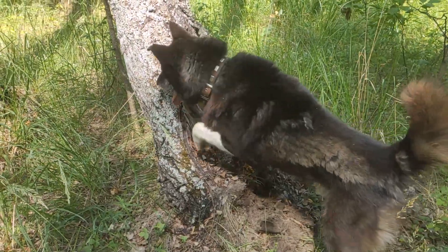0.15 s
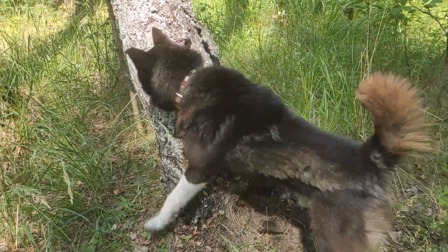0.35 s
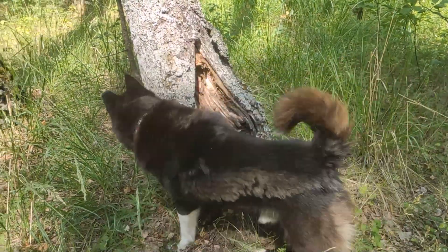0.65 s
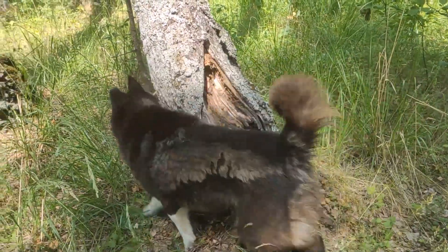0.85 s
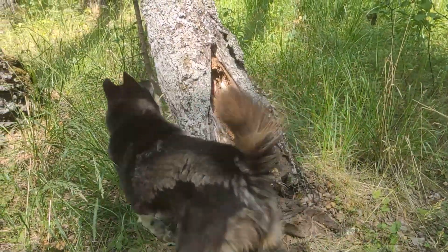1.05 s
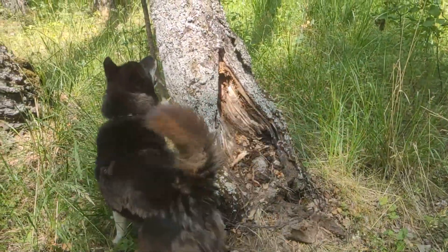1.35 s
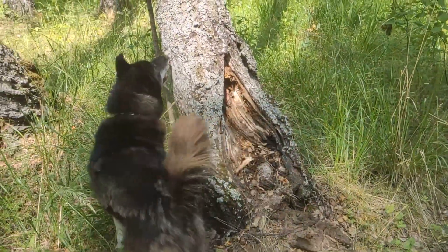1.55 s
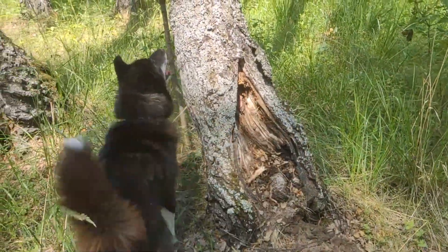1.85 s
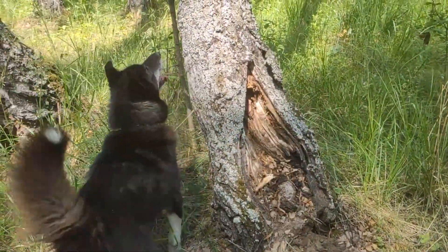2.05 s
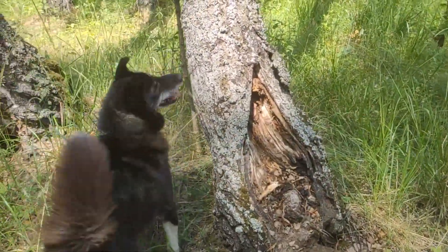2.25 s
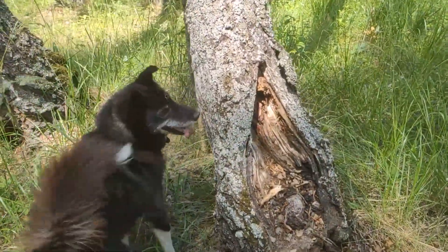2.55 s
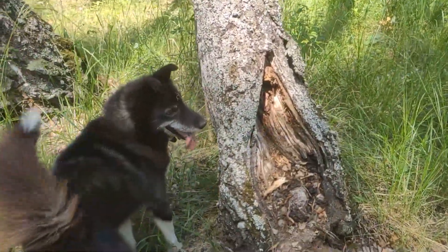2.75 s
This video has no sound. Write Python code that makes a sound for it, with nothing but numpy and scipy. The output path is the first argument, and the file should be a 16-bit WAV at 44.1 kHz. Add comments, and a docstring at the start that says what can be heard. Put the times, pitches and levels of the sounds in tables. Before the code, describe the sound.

A dog rustles through dry grass and litter after its claws snap crumbling wood off a trunk

```python
"""Dog in a dry forest

A dog drops from a rotten tree trunk, its claws snapping off bits of bark, and walks round through dry grass.
Stems swish along its legs and coat, dead litter crunches under its paws and twigs crack, over quiet forest air.
Crackling noise makes the grass, litter and crumbs; fading noise makes the thuds; sharp bursts make the snaps.
Two microphone ports each colour the high treble in their own way."""
import sys
import numpy as np
from scipy import signal
from scipy.fft import rfft, irfft, next_fast_len
from scipy.io import wavfile
from scipy.ndimage import uniform_filter1d, map_coordinates

SR = 44100
rng = np.random.default_rng(int(sys.argv[2]) if len(sys.argv) > 2 else 0)


def master_out(mix):
    """Clip the mix to full scale and print it as 16-bit PCM to the path in sys.argv[1]."""
    frames = np.transpose(np.atleast_2d(mix))
    ceiling = np.clip(frames, -1, 1)
    pcm = np.round(ceiling * 32767).astype(np.int16)
    wavfile.write(sys.argv[1], SR, pcm)


N = 127890  # length [samples]

# colour of splintering wood: (frequency [Hz], level [dB])
SPLINTER_COLOUR = [(200, -20.5), (1500, -24), (3200, -23.5), (5000, -9), (7500, -3.5), (9800, 0.5),
                   (14000, -1.5)]


def amp(db):
    """Turn decibels into a gain."""
    return 10 ** (np.asarray(db) / 20)


def unit(x):
    """Scale to an average strength (rms) of 1."""
    return x / np.sqrt(np.mean(x ** 2) + 1e-20)


def along(points, hz):
    """Read a curve of (frequency [Hz], value) points, spaced as the ear hears pitch (log axis)."""
    point_hz, value = np.transpose(points)
    return np.interp(np.log(hz + 1), np.log(point_hz + 1), value)


def filtered(x, response):
    """Filter x with a gain that depends on frequency."""
    length = next_fast_len(N + 8192)  # silent padding, so that the end does not wrap round to the start
    gain = response(np.fft.rfftfreq(length, 1 / SR))
    return irfft(rfft(x, length) * gain, length)[..., :N]


def wobble(rate):
    """Draw a smooth random curve through `rate` random points a second."""
    points = rng.standard_normal(N // 100)
    return map_coordinates(points, [np.arange(N) * rate / SR], mode="wrap")


def white():
    """Make two unrelated noises."""
    return rng.standard_normal((2, N))


def coloured(pair, spectrum):
    """Colour a white pair at equal power; how alike left and right are depends on frequency."""
    # likeness of left and right: (frequency [Hz], likeness [0 to 1])
    likeness = [(30, 0.033), (130, 0.31), (400, 0.76), (1100, 0.54), (2500, 0.21), (5000, 0),
                (14000, 0.026)]
    norm = np.sqrt(np.mean(amp(along(spectrum, np.linspace(0, SR / 2, 2000))) ** 2))

    def response(hz):
        # a small angle puts most power in the middle, a larger one more at the sides
        angle = np.arccos(np.clip(along(likeness, hz), -1, 1)) / 2
        return amp(along(spectrum, hz)) / norm * [np.cos(angle), np.sin(angle)]

    mid, side = filtered(pair, response)
    return np.array([mid + side, mid - side])


def panned(db):
    """Give left and right gains for a right-left difference."""
    return amp([[-db / 2], [db / 2]])


def fade(t, t60):
    """Stay full until t = 0, then fall 60 dB in t60 seconds."""
    return np.exp(-np.log(1000) * np.maximum(t, 0) / t60)


def since(s):
    """Count the seconds since time s, for every sample."""
    return np.arange(N) / SR - s


def strokes(rows, t60):
    """Shape stereo strokes that rise, hold and die away; where they overlap, their powers add."""
    power = 0
    for start, rise, hold, db, pan_db in rows:
        swell = np.clip(since(start) / rise, 0, 1)
        shape = swell * fade(since(start + rise + hold), t60)
        power = power + (amp(db) * panned(pan_db) * shape) ** 2
    return np.sqrt(power)


def crackle(per_s, spread_db, hiss, grain_t60=0.0086):
    """Tiny fractures of random size, over the hiss of those too small to tell apart."""
    struck = rng.random(N) < per_s / SR
    size = amp(spread_db * np.minimum(rng.exponential(size=N), 4))
    hits = struck * size ** 2
    # each hit dies away; doubling the time step turns the amplitude fade into a power fade
    power = signal.lfilter([1], [1, -fade(2 / SR, grain_t60)], hits)
    return unit(white() * np.sqrt(power / power.mean() + hiss ** 2))


def patchy(pair, depth_db):
    """Make small patches of time and pitch louder or softer: each flurry favours its own pitches."""
    z = signal.stft(pair, nperseg=512)[2]
    field = rng.standard_normal(z.shape[1:])
    for axis in (0, 1):  # smooth over pitch, then time
        field = uniform_filter1d(field, size=5, axis=axis)
    patched = signal.istft(z * amp(depth_db * unit(field)), nperseg=512)[1]
    return unit(patched[:, :N])


def add(track, s, sound):
    """Mix a short sound in at time s."""
    part = track[:, max(round(s * SR), 0):][:, :sound.shape[-1]]
    part += sound[..., :part.shape[1]]


def air():
    """Quiet forest air is a steady noise; a light breeze on the ports is a low noise that swells and sinks."""
    # colour of the forest air: (frequency [Hz], level [dB])
    air_colour = [(25, 1), (60, -19), (120, -8), (380, -12.5), (900, -19), (2400, -8), (3500, -20),
                  (6000, -9.5), (10000, -13), (14000, -12.5)]
    # colour of the breeze: (frequency [Hz], level [dB])
    wind_colour = [(8, 0), (25, -13), (60, -16), (150, -34), (400, -65)]
    air_db, wind_db, wind_swing_db = -50, -55, 2
    wind_gain = amp(wind_db + wind_swing_db * wobble(rate=5.03))
    return amp(air_db) * coloured(white(), air_colour) + wind_gain * coloured(white(), wind_colour)


def steps():
    """Soft paws thud on the forest floor: each landing is a burst of mostly low noise that dies away."""
    # paws landing: (time [s], level [dB])
    landings = [(0.265, -52), (0.398, -65), (0.504, -50.5), (0.792, -46.5), (1.17, -47), (1.567, -54),
                (1.7394, -41.5)]
    # colour of the ground: (frequency [Hz], level [dB])
    ground_colour = [(40, -13), (120, -0.5), (240, -0.5), (500, -8), (1200, -7.5), (3000, -26.5)]
    thuds = 0
    for s, db in landings:
        thuds = thuds + amp(db) * (since(s) >= 0) * fade(since(s), t60=0.064)
    return coloured(thuds * white(), ground_colour)


def litter():
    """Needles and wood crumbs crush in flurries under the paws, which scuff in the soil below; now and then the
    dog pants, soft and hollow."""
    # Strokes: (start [s], rise [s], hold [s], level [dB], right-left difference [dB])
    crunches = [(.495, 0.037, .05, -55, -2), (.715, 0.02, 0.011, -47, -2.5),
                (1.54, 0.027, 0.0078, -48.5, -1), (1.73, 0.085, 0.058, -47, -9),
                (1.87, 0.036, 0.067, -45.5, -9), (2.06, 0.061, 0.057, -45, -6),
                (2.18, 0.017, 0.16, -50, -6), (2.32, 0.12, 0.05, -43, 1.5),
                (2.5, 0.032, 0.052, -46.5, -7.5)]  # weight pressing on dead litter
    scuffs = [(.5, 0.079, 0.088, -54.5, -5), (.77, 0.016, 0.006, -50.5, -2),
              (1.165, 0.0078, 0.023, -60, -3), (1.27, 0.0064, 0.035, -54.5, 0),
              (1.485, 0.01, 0.065, -58, -4.5), (1.76, 0.1, 0.11, -58, 3), (2.11, 0.013, .01, -61, 6),
              (2.82, .035, 0.042, -56.5, -1)]  # paws scuffing the soil
    breaths = [(.32, 0.021, 0.28, -62.5, -5), (1.485, 0.017, 0.033, -61, -10), (1.77, 0.02, 0.25, -61, -7),
               (2.03, 0.025, 0.22, -61, -6), (2.47, 0.029, 0.07, -55.5, -4), (2.58, 0.026, 0.17, -64, -5),
               (2.81, 0.034, 0.02, -56, -5.5)]  # soft, hollow panting breaths
    # Colours: (frequency [Hz], level [dB])
    litter_colour = [(150, -28), (500, -10), (1100, -8.5), (1700, 2), (2300, 8.5), (3200, -1), (4200, 1),
                     (5800, -9), (12000, -8)]
    soil_colour = [(80, 5), (300, -4), (750, 4), (1400, 3.5), (3000, -7.5)]
    hollow_colour = [(120, -31), (260, -9), (370, 2.5), (500, -6.5), (640, -10), (800, -3.5), (1300, -47),
                     (3000, -14.5)]

    crunch = patchy(crackle(per_s=420, spread_db=-1.5, hiss=0.88), depth_db=3)
    crunch = crunch * strokes(crunches, t60=0.37)
    scuff = patchy(crackle(per_s=700, spread_db=-0.5, hiss=0.37), depth_db=2.5)
    scuff = scuff * strokes(scuffs, t60=0.34)
    breath = patchy(white(), depth_db=3.0) * strokes(breaths, t60=0.24)
    return coloured(crunch, litter_colour) + coloured(scuff, soil_colour) + coloured(breath, hollow_colour)


def grass():
    """Dry stems tick past the moving dog and go on settling behind it; green blades slide with a duller hiss."""
    # Strokes: (start [s], rise [s], hold [s], level [dB], right-left difference [dB])
    swishes = [(.33, 0.11, 0.07, -39.5, 2.5), (.465, 0.048, .005, -34, 0), (.498, 0.0053, 0.0064, -23.5, 0),
               (.525, 0.012, 0.045, -30, -3.5), (.7, 0.032, 0.087, -34.5, 0.5),
               (.86, 0.0076, 0.046, -38, 4), (.964, 0.0037, 0.025, -29.5, 4),
               (1.0, 0.0064, 0.066, -36.5, -1), (1.06, 0.03, 0.096, -32.5, 1.5),
               (1.16, 0.016, 0.013, -23, 1), (1.2, 0.014, 0.089, -33.5, 1.5),
               (1.26, 0.082, 0.077, -28.5, 2), (1.45, 0.013, 0.061, -38, 2), (1.54, 0.028, 0.0053, -28, -1),
               (1.6, 0.019, 0.057, -42.5, 1), (1.685, 0.025, 0.0075, -33.5, -2),
               (1.739, 0.0014, 0.0023, -25, 0.5), (1.765, 0.02, 0.11, -32, 2),
               (1.88, 0.01, 0.059, -28.5, 1.5), (1.942, 0.0095, 0.0062, -21, 2.5),
               (1.98, 0.015, 0.12, -40, 0.5), (2.06, 0.072, 0.17, -35, 0.5), (2.31, 0.046, 0.26, -33, 0)]  # stems brushing the dog
    slides = [(.39, 0.0075, 0.058, -47, -1), (.495, 0.025, 0.1, -39.5, 7), (.64, 0.013, 0.089, -48.5, 0.5),
              (.72, 0.0058, 0.081, -38.5, 0), (.82, 0.018, 0.16, -45.5, -1.5),
              (1.165, 0.008, 0.0085, -36, -5), (1.27, 0.062, 0.094, -46.5, -6),
              (1.55, 0.01, 0.014, -39.5, 5)]  # broad green blades sliding along the coat
    # Colours: (frequency [Hz], level [dB])
    stem_colour = [(200, -36), (900, -17), (1600, -19.5), (2200, -7.5), (3300, -15), (5500, -10),
                   (7500, 0.5), (11000, 1), (14000, -1)]
    blade_colour = [(1000, -28), (3000, -46), (4300, -4.5), (5400, 3), (6800, 5.5), (8500, -12),
                    (14000, -4.5)]

    swish = patchy(crackle(per_s=3800, spread_db=2.5, hiss=0.94), depth_db=2.1)
    swish = swish * strokes(swishes, t60=0.19)
    swish = swish * amp(0.59 * wobble(rate=110))  # a fast, slight flutter in level

    # the grass is first stirred as the dog comes down
    settle_db, settle_start_s, settle_rise_s = -46.5, 0.17, 0.44
    settle = amp(settle_db) * panned(db=-3.0) * crackle(per_s=530, spread_db=9.0, hiss=0.91)
    settle = settle * np.clip(since(settle_start_s) / settle_rise_s, 0, 1)

    slide = patchy(crackle(per_s=1100, spread_db=-4.0, hiss=0.72), depth_db=1.5)
    slide = slide * strokes(slides, t60=0.2)
    return coloured(swish + settle, stem_colour) + coloured(slide, blade_colour)


def crumbs():
    """Small flakes of rotten wood tick loose under the claws, in flurries that favour different pitches."""
    # rotten wood crumbling: (start [s], rise [s], hold [s], level [dB], right-left difference [dB])
    crumbles = [(0, 0.0063, 0.25, -45.5, -1), (.23, 0.13, 0.2, -44, -5), (.47, 0.042, 0.13, -39.5, 1.5)]
    flakes = crackle(per_s=280, spread_db=2.5, hiss=.22, grain_t60=.006)
    ticks = patchy(flakes, depth_db=4)
    return coloured(ticks * strokes(crumbles, t60=0.46), SPLINTER_COLOUR)


def snaps():
    """Each break is one sharp crack with a tail of splinters; the broken piece rings briefly round its own pitch."""
    # bark and twigs breaking; the levels are before the two trims on the last line:
    # (time [s], level [dB], right-left difference [dB], woody body against level [dB], pitch of the piece [Hz])
    breaks = [(.128, -35.5, 5, 0, 2500), (.1662, -35, 1, 0, 5000), (.209, -34, 9, -4, 5500),
              (0.217, -31.5, -9, -3, 4900), (.232, -26.5, 0, -5, 6500), (0.241, -37, -2, -6, 5500),
              (0.2533, -29, -3, -8, 2590), (0.2573, -35, 2, 6, 2170), (.2915, -33, 4, -13, 7040),
              (.3108, -24, -6, -18, 5500), (0.3132, -24, 6, -13, 7000), (.326, -36, -6, 2, 2950),
              (0.3326, -34, 7, 2, 4020), (.4003, -15.5, -4, -16, 1800), (.4222, -23, -3, -16, 2800),
              (.555, -32.5, -5, 6, 4550), (.6078, -14.5, 1, -20, 5000), (0.957, -27.5, 3, -0.5, 6040),
              (1.621, -43, 1, 14.5, 1300), (1.7417, -15.5, 1, -13, 2200), (1.753, -28, 9, -0.5, 3000),
              (1.89, -27, 2, 6, 1660), (1.909, -28, 2, 6, 3000), (1.9174, -24, -2, 8.5, 2700),
              (1.9269, -24, 3, 2.5, 1800), (1.9692, -23, 8, -3, 4000), (2.0714, -22, 10, -10, 4000),
              (2.0936, -19, -1, -2.5, 3280), (2.1269, -35.5, -5, 9.5, 2170), (2.128, -38, 1, 12, 950),
              (2.153, -21.5, 0, -24, 4000), (2.226, -38.5, 0, 11, 2400), (2.3212, -26, 0, -9, 2470),
              (2.3446, -24, -6, -13, 1500), (2.356, -18, 1, -8, 2800), (2.3602, -32, -4, -17, 5000),
              (2.691, -26.5, 8, -16, 4000), (2.7231, -32, 7, -11, 4200)]
    snap_t60, splinter_t60, wood_t60 = 0.0049, 0.025, .011  # fading times [s]
    crack_db, splinter_db = 9.5, -17  # first click and long tail, against the short burst
    splinters_db, wood_db = 1.5, -9  # trims of the two layers
    wood_q = 2.9  # low: the ring has only a blurred pitch

    crack, body = np.zeros((2, N)), np.zeros((2, N))
    t = np.arange(SR // 20) / SR
    for s, db, pan_db, body_db, hz in breaks:
        noise = rng.standard_normal((3, len(t)))
        size = amp(db) * panned(pan_db)
        tail = fade(t, snap_t60) + amp(splinter_db) * fade(t, splinter_t60)
        splinters = np.sign(noise[:2]) * tail
        click = amp(crack_db) * (t == 0)
        add(crack, s, size * (splinters + click))
        ring = unit(signal.lfilter(*signal.iirpeak(hz, wood_q, SR), noise[2]))
        add(body, s, size * amp(body_db) * ring * fade(t, wood_t60))
    return amp(splinters_db) * coloured(crack, SPLINTER_COLOUR) + amp(wood_db) * body


def echoed(x):
    """Add to the direct sound its first reflections, each a delayed and softer copy."""
    # echoes off the ground and the trunk: (left delay [ms], right delay [ms], level [dB])
    echoes = [(1.1, 0.975, -35), (2.9, 3.5, -15), (7.3, 6.6, -15)]

    def response(hz):
        total = 1
        for left_ms, right_ms, db in echoes:
            delay_s = np.array([[left_ms], [right_ms]]) / 1000
            total = total + amp(db) * np.exp(-2j * np.pi * hz * delay_s)
        return total

    return filtered(x, response)


def scene():
    """Add up everything that reaches the microphone ports; steps and air have no echoes."""
    return air() + steps() + echoed(litter() + grass() + crumbs() + snaps())


def record(dry):
    """Each port colours the sound in its own way; nothing is kept above the band limit."""
    # colour of each microphone port: (frequency [Hz], level [dB])
    left_port = [(1000, 1), (1900, -2.5), (4000, 4.5), (6000, -4), (8000, -4), (9200, 3), (10400, 3),
                 (12300, -0.5), (14000, -2)]
    right_port = [(1000, 1), (2100, 1), (4000, 5), (6700, -1), (7900, 7), (8850, 15), (9900, 1.5),
                  (12200, -2.5), (14000, -1.5)]
    top_hz = 14350
    ported = filtered(dry, lambda hz: amp([along(left_port, hz), along(right_port, hz)]))
    return filtered(ported, lambda hz: hz < top_hz)


dry = scene()
out = record(dry)
master_out(out)
```